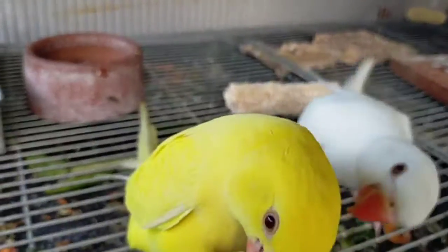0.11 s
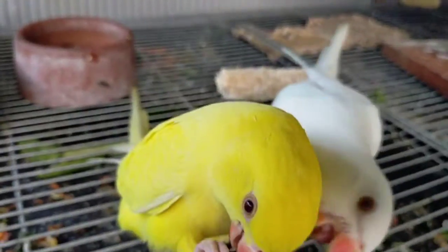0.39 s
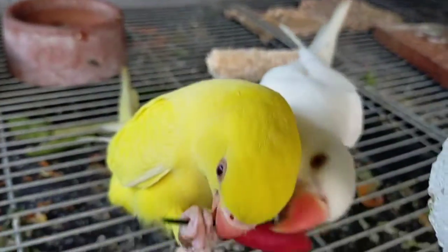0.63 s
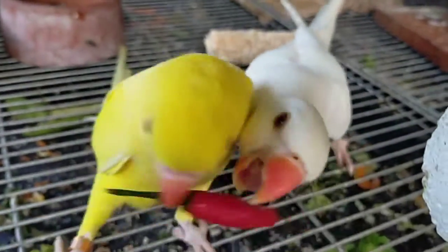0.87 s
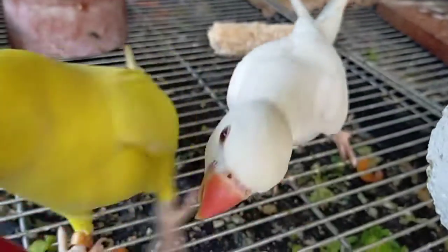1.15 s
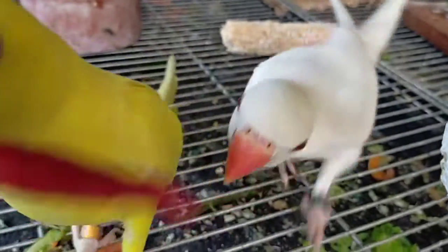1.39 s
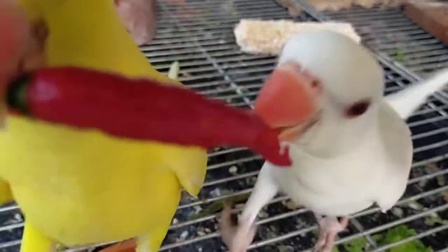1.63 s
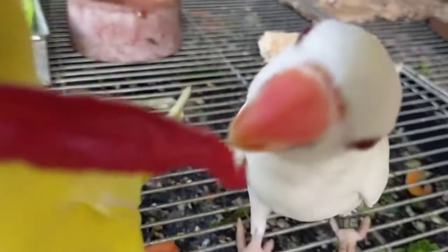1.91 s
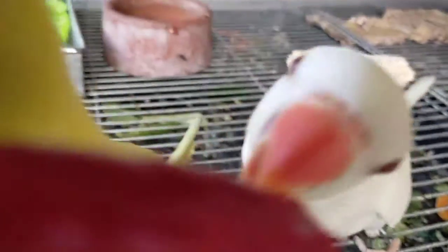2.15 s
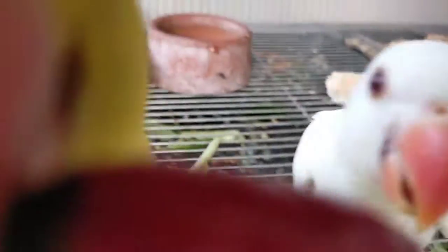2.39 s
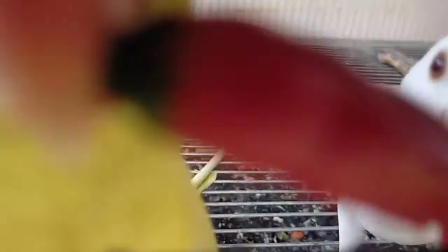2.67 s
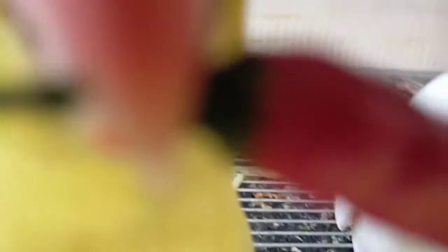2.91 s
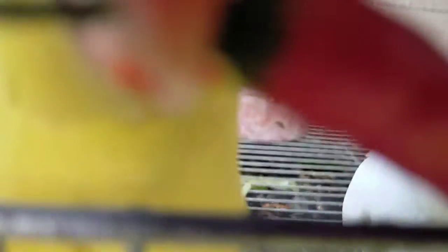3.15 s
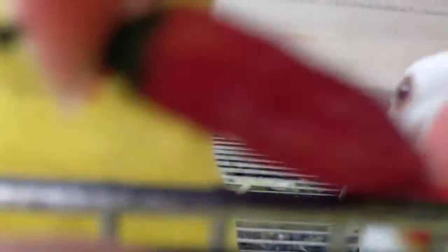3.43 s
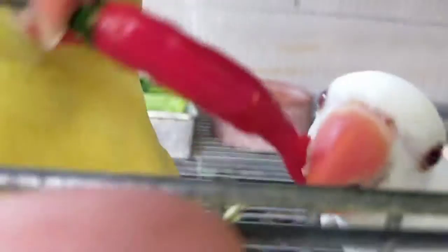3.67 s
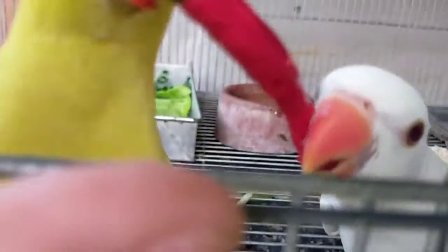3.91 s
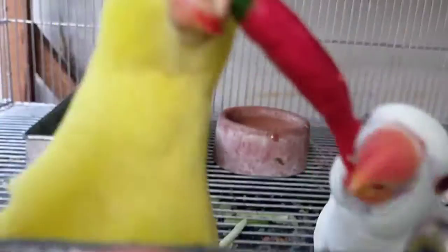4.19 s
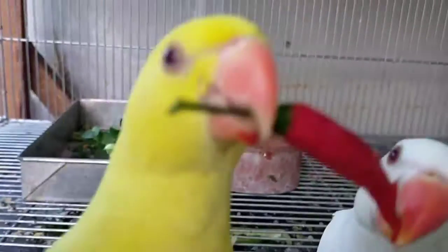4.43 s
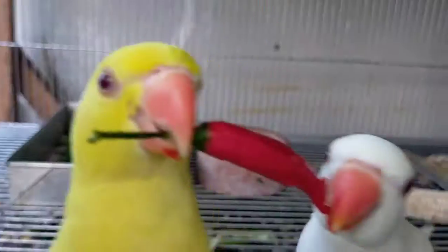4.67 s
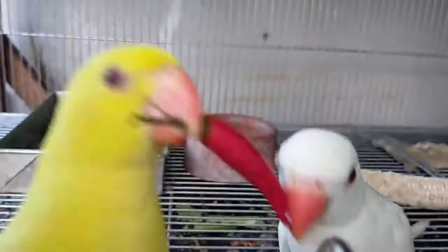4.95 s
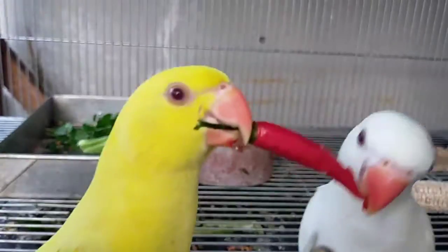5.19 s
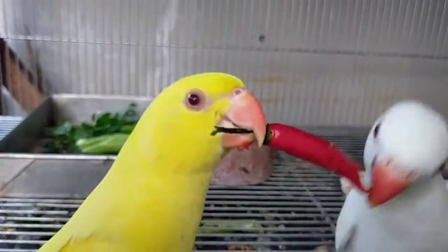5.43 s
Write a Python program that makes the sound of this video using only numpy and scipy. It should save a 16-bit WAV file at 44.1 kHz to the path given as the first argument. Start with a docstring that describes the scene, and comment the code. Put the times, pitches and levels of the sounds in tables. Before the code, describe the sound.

Indoor bird cage, recorded close with some room echo. One bird gives a regular series of dry, scratchy rasps; after a brief pause come two clear, high chirps. A hard click leads into fast, strident two-toned chatter, the loudest part. It ends with a single rasp and a quick two-part warble, leaving quiet room hiss, faint street rumble, distant thin whistles, light claw ticks and a soft rustle.

```python
"""Parakeets close to the microphone in an indoor aviary: one rasps in a steady run as uneven slaps ring its
throat, one chirps twice, and one chatters loudly with both sides of its syrinx. Another warbles, and far off
others whistle; all these notes are near sines that waver and fray. Claws tick on the wire floor as cracks and
dying rattles, feathers rustle as shaped noise, and distant traffic rumbles under the hiss of the room."""
import sys
import numpy as np
from scipy import signal
from scipy.fft import rfft, irfft
from scipy.io import wavfile

SR = 44100
rng = np.random.default_rng(int(sys.argv[2]) if len(sys.argv) > 2 else 0)


def dump_mix(stems):
    """Bounce the given channels to the path in sys.argv[1] as a 16-bit WAV at rate SR."""
    frames = np.atleast_2d(stems).T  # one column per channel
    limited = np.clip(frames, -1, 1)  # hard clip at full scale
    pcm = np.round(limited * 32767).astype(np.int16)
    wavfile.write(sys.argv[1], SR, pcm)


def level_to_linear(level):
    """Convert decibel levels to linear amplitude factors, elementwise."""
    exponent = np.asarray(level, float) / 20
    return 10 ** exponent


N = 245677
TIME = np.arange(N) / SR

# air forced past the syrinx in each chatter burst: start t/s, length/s, level/dB, swell through the hold/dB
AIR_BURSTS = [(2.972, 0.047, -32.5, 3), (3.018, 0.043, -27.5, 4.5), (3.108, 0.091, -34.5, 11),
              (3.226, 0.09, -29, 2.1), (3.34, .096, -29.5, 1), (3.466, 0.084, -26, -1),
              (3.586, .084, -30.5, 1), (3.71, 0.12, -30.5, -5)]


def rms_one(x):
    """Scale to unit power."""
    return x / np.sqrt(np.mean(x ** 2) + 1e-20)


def at_hz(points, hz):
    """Read a spectrum on a log frequency axis."""
    known_hz, known_db = np.transpose(points)
    return np.interp(np.log(hz + 1), np.log(known_hz), known_db)


def coloured(x, spectrum):
    """Give a signal a spectrum, with nothing far outside its ends; rms 1."""
    hz = np.fft.rfftfreq(len(x), 1 / SR)
    inside = (hz > .7 * spectrum[0][0]) * (hz < 1.1 * spectrum[-1][0])
    return rms_one(irfft(rfft(x) * level_to_linear(at_hz(spectrum, hz)) * inside, len(x)))


def drift(rate_hz, size=N):
    """Random wander of rms 1, mostly slower than the rate."""
    r = np.exp(-2 * np.pi * rate_hz / SR)
    wander = signal.lfilter([1], [1, -2 * r, r * r], rng.standard_normal(size + 4000))
    return rms_one(wander[4000:])


def narrow_noise(hz, q):
    """Noise through the same sharp resonance twice, heard as an unsteady tone; rms 1."""
    b, a = signal.iirpeak(hz, q, fs=SR)
    once = signal.lfilter(b, a, rng.standard_normal(N))
    return rms_one(signal.lfilter(b, a, once))


def treble(x, edge_hz):
    """The part above an edge."""
    return signal.sosfilt(signal.butter(2, edge_hz, "high", fs=SR, output="sos"), x)


def ring(x, resonances):
    """Each resonance lifts or dips a region around its centre; rms 1."""
    hz = np.fft.rfftfreq(N, 1 / SR)
    lift_db = sum(db / (1 + (2 * (hz - centre) / width) ** 2) for centre, width, db in resonances)
    return rms_one(irfft(rfft(x) * level_to_linear(lift_db), N))


def envelope(tables, edge_s):
    """Gain of separate sounds, silent between them, with short fades."""
    out = np.zeros(N)
    for rows in tables:
        s, db = np.array(rows)[:, 0], np.array(rows)[:, -1]
        fade = np.clip(np.minimum(TIME - s[0], s[-1] - TIME) / edge_s, 0, 1)
        out += fade * level_to_linear(np.interp(TIME, s, db))
    return out


def arch(start, length, db, shape, swell_db=0):
    """Corner shares, times and levels of one sound: attack, hold, release."""
    attack, release, first_db, last_db = shape
    # attack and release each take at least a fiftieth and at most about half of the sound
    share = np.array([0, np.clip(attack, .02, .49), 1 - np.clip(release, .02, .5), 1])
    corner_db = db + np.array([first_db, 0, swell_db, swell_db + last_db])
    return share, start + length * share, corner_db


def swells(rows, shape):
    """Rows of unpitched sounds as (s, dB) corners."""
    return [np.transpose(arch(*row[:3], shape, *row[3:])[1:]) for row in rows]


def glides(rows, shape):
    """Rows of notes as (s, Hz, dB) corners; the pitch slides evenly from first to last."""
    out = []
    for start, length, db, first_hz, last_hz, *swell_db in rows:
        share, s, corner_db = arch(start, length, db, shape, *swell_db)
        pitch = first_hz + (last_hz - first_hz) * share
        out.append(np.transpose([s, pitch, corner_db]))
    return out


def notes(tables, overtones_db, waver, rough, flutter_rate, fray_db=-60.0):
    """A membrane sings a near sine with overtones; its pitch wavers, its swing flutters and frays into noise."""
    out = np.zeros(N)
    wander, flutter, fray = drift(flutter_rate), drift(flutter_rate), drift(820)
    for rows in tables:
        s, hz = np.array(rows)[:, 0], np.array(rows)[:, 1]
        span = slice(int(s[0] * SR), int(s[-1] * SR))
        pitch = np.interp(TIME[span], s, hz) * (1 + waver * wander[span])
        phase = 2 * np.pi * np.cumsum(pitch) / SR
        tone = np.sin(phase)
        for k, db in enumerate(overtones_db, start=2):
            throat_pass = 1 / (1 + (k * pitch / 12000) ** 8)   # the throat passes little at the very top
            tone += level_to_linear(db) * np.sin(k * phase) * throat_pass
        swing = (1 + rough * flutter[span]) / np.sqrt(1 + rough ** 2)
        swing += level_to_linear(fray_db) * fray[span]
        out[span] += np.sqrt(2) * tone * swing * envelope([rows], edge_s=0.0018)[span]
    return out


def hoarse(throat, per_s, spread_db, breath):
    """Membranes slap shut at uneven moments; the slaps and the air between them ring the throat."""
    sizes = level_to_linear(spread_db * np.minimum(rng.exponential(1, N), 4)) * rng.choice([-1, 1], N)
    slaps = rms_one(sizes * (rng.random(N) < per_s / SR))
    return coloured(slaps + breath * rng.standard_normal(N), throat)


def early(x):
    """The direct sound and a short dense cluster of reflections from wire, wall and dishes."""
    t60_s, cluster_db = .065, -2.5   # the cluster's power is relative to the direct sound
    t = TIME[:SR // 5]
    cluster = rng.standard_normal(len(t)) * level_to_linear(-60 * t / t60_s) * (t > .001)
    cluster *= level_to_linear(cluster_db) / np.sqrt(np.sum(cluster ** 2))
    cluster[0] = 1   # the direct sound
    return signal.fftconvolve(x, cluster / np.sqrt(np.sum(cluster ** 2)))[:N]


def room(x):
    """Diffuse echo: dying noise in bands of three quarters of an octave, convolved with the sound."""
    # decay of the room: f/Hz, t60/s
    room_t60 = [(1000, 0.72), (3500, 0.6), (7000, 0.44), (14000, 0.39)]
    t, band_edges = TIME[:SR], 700 * 2 ** np.arange(0, 4.6, .75)
    tail = np.zeros(SR)
    for low, high in zip(band_edges, band_edges[1:]):
        sos = signal.butter(2, [low, high], "band", fs=SR, output="sos")
        band = signal.sosfilt(sos, rng.standard_normal(SR))
        tail += band * level_to_linear(-60 * t / at_hz(room_t60, np.sqrt(low * high)))
    tail *= t > .004   # the echo starts after a short gap
    return signal.fftconvolve(x, tail / np.sqrt(np.sum(tail ** 2)))[:N]


def street(level_db, patchy_db):
    """The far hubbub of the street: narrow bands of noise that come and go on their own."""
    out = np.zeros(N)
    for hz in np.geomspace(600, 2900, num=14):
        out += narrow_noise(hz, q=22) * level_to_linear(patchy_db * drift(6.0))
    return level_to_linear(level_db) * rms_one(out)


def background():
    """Room hiss, street hubbub, low traffic rumble and a distant motor's hum, a narrow band of noise."""
    # spectra of hiss and rumble: f/Hz, relative level/dB
    hiss_colour = [(150, -5), (200, -3), (250, -3), (300, -8.5), (500, -7.5), (690, -5.5), (1150, -8),
                   (1600, -5), (2050, -1.5), (2650, -2), (3100, -11.5), (3600, -16), (5100, -20.5),
                   (7600, -21.5), (16000, -39)]
    rumble_colour = [(12, -57), (20, 11.5), (107, 0), (166, -21), (220, -30), (290, -22), (480, -120)]
    # slow swelling of hiss, rumble and hum: t/s, level/dB
    hiss_level = [(0.0, -46), (0.17, -44), (0.39, -48), (1.07, -47.5), (2.09, -49), (2.99, -47.5),
                  (3.4, -49), (5.3, -48.5), (5.57, -47.5)]
    rumble_level = [(0.0, -46.5), (0.25, -47), (0.45, -55), (0.57, -45.5), (1.39, -48.5), (1.63, -53.5),
                    (2.0, -49.5), (3.54, -49.5), (3.75, -54.5), (4.56, -55.5), (4.7, -53.5), (5.57, -54.5)]
    hum_level = [(0.0, -49.5), (0.15, -59), (0.53, -44.5), (0.85, -46.5), (1.2, -54), (1.55, -57),
                 (2.19, -52), (2.45, -57), (3.3, -52.5), (3.54, -70.5), (5.57, -68.5)]
    hum_hz, hum_width_hz = 104.7, 31
    hiss = coloured(rng.standard_normal(N), hiss_colour) * level_to_linear(np.interp(TIME, *np.transpose(hiss_level)))
    rumble = coloured(rng.standard_normal(N), rumble_colour)
    rumble *= level_to_linear(np.interp(TIME, *np.transpose(rumble_level)))
    hum = narrow_noise(hum_hz, q=hum_hz / hum_width_hz) * level_to_linear(np.interp(TIME, *np.transpose(hum_level)))
    return hiss + street(level_db=-60.5, patchy_db=5.5) + rumble + hum


def far_birds():
    """Thin whistles and faint low tones from far away, each a bare sliding sine that wavers."""
    # whistles, then low tones: start t/s, length/s, level/dB, first f/Hz, last f/Hz
    whistle_rows = [(2.754, .014, -55, 8600, 7100), (4.215, .045, -56, 7900, 7100),
                    (4.27, 0.1, -54.5, 7300, 7180), (4.745, .02, -62, 5250, 5250),
                    (4.822, .082, -54.5, 7570, 6600), (4.9, .015, -59, 4700, 4680),
                    (5.05, .025, -61, 4480, 4500), (5.095, .02, -61, 4900, 4880),
                    (5.134, .014, -55.5, 8150, 8600), (5.215, .03, -62, 5260, 5200),
                    (5.35, .06, -56.5, 7050, 7100), (5.405, 0.072, -51.5, 7120, 7250)]
    low_tone_rows = [(.94, 0.23, -55, 890, 850), (2.33, 0.079, -51, 690, 650), (5.05, .24, -53, 1500, 1500),
                     (5.45, 0.076, -52, 1077, 1020)]
    # attack share, release share, start/dB, end/dB
    far_shape = (.2, 0.6, -3, -21)
    whistles = notes(glides(whistle_rows, far_shape), [], waver=0.0036, rough=0.16, flutter_rate=110)
    tones = notes(glides(low_tone_rows, far_shape), [], waver=0.0026, rough=0.5, flutter_rate=22)
    return whistles + tones


def rustle():
    """Feathers brush: dense uneven pulses and breathy noise, coloured and swelling briefly."""
    # start t/s, length/s, level/dB
    rustle_rows = [(4.6, .05, -58), (4.82, 0.22, -62), (4.985, 0.12, -47.5), (5.44, 0.17, -59)]
    # f/Hz, relative level/dB
    feather_colour = [(1000, -5), (3000, 3), (6000, -10), (9000, 1.5), (13000, -4), (16000, -2)]
    # attack share, release share, start/dB, end/dB
    rustle_shape = (0.5, 1, -8, -17)
    brushing = hoarse(feather_colour, per_s=9000, spread_db=2.0, breath=0.62)
    return brushing * envelope(swells(rustle_rows, rustle_shape), edge_s=.005)


def ticks():
    """Claws on the wire floor: a sharp crack, then the mesh rattles out as dying noise."""
    # t/s, crack level/dB, rattle level/dB, treble gain/dB, rattle t60/s
    tick_rows = [(.034, -59, -39.5, -0.5, 0.52), (.113, -54, -48, -1, 0.099), (.17, -50, -46, -6, 0.091),
                 (.232, -56, -68, 9, 0.092), (1.567, -61, -43.5, 8, 0.17), (2.948, -28, -40, -22, 0.34),
                 (4.57, -59, -38, 11, 0.26), (5.452, -52, -48, -5, 0.13)]
    # f/Hz, relative level/dB
    mesh_colour = [(350, -62), (600, -23), (768, 5.5), (1100, -11), (1220, 1), (1770, 2), (1890, -7),
                   (2110, 4), (2560, 5), (4020, -9.5), (5140, -19.5), (8190, -11), (15800, -21)]
    noise = coloured(rng.standard_normal(N), mesh_colour)
    bright = treble(noise, edge_hz=4200)
    out = np.zeros(N)
    for s, crack_db, rattle_db, bright_db, t60 in tick_rows:
        after = np.maximum(TIME - s, 0)
        crack = level_to_linear(crack_db - 60 * after / 0.0061)
        rattle = level_to_linear(rattle_db - 60 * after / t60)
        out += (TIME > s) * (crack + rattle) * (noise - bright + level_to_linear(bright_db) * bright)
    return out


def warble():
    """A run of short sliding notes without overtones, slightly frayed."""
    # start t/s, length/s, level/dB, first f/Hz, last f/Hz
    warble_rows = [(3.968, .012, -50, 3800, 3880), (3.986, 0.034, -29.5, 2760, 2500),
                   (4.013, 0.035, -30, 2926, 3023), (4.036, .03, -35.5, 2600, 2400),
                   (4.053, 0.019, -38, 3570, 3030), (4.066, 0.027, -23, 2530, 2653),
                   (4.092, .022, -41.5, 1675, 1620), (4.212, 0.036, -48, 3540, 2940),
                   (4.232, 0.018, -35.5, 2750, 2510), (4.248, 0.025, -36.5, 3640, 3360),
                   (4.264, 0.012, -39, 2990, 2650), (4.268, 0.035, -30, 2540, 2680),
                   (4.296, .02, -46, 1760, 1550)]
    # attack share, release share, start/dB, end/dB
    warble_shape = (0, .3, -15, -7)
    return notes(glides(warble_rows, warble_shape), [], waver=0.015, rough=0.33, flutter_rate=250, fray_db=-27)


def chirps():
    """Two chirps: a bending main voice with a high lead-in, and a second voice under it."""
    # main voice, one table a note: t/s, f/Hz, level/dB
    main_notes = [
        [(2.272, 3800, -37), (2.284, 3744, -39), (2.291, 3900, -28), (2.298, 4820, -34.5), (2.306, 4250, -29.5),
         (2.316, 3700, -33)],
        [(2.314, 3390, -46), (2.322, 3423, -28.5), (2.334, 3390, -34), (2.344, 3420, -35)],
        [(2.342, 4050, -32), (2.35, 3940, -29.5), (2.36, 3660, -31.5), (2.372, 3560, -35), (2.385, 3527, -31.5),
         (2.396, 3450, -40)],
        [(2.446, 4410, -38), (2.451, 3993, -29.5), (2.46, 3784, -30.5), (2.474, 3680, -33), (2.49, 3750, -29.5),
         (2.506, 3793, -27.5), (2.513, 3800, -45)],
    ]
    # second voice, then lead-in: start t/s, length/s, level/dB, first f/Hz, last f/Hz
    under_rows = [(2.306, .03, -33, 2260, 2210), (2.465, 0.038, -27.5, 2403, 2330)]
    lead_rows = [(2.264, 0.0115, -43, 6500, 4240), (2.428, .036, -39, 5950, 5480)]
    # attack share, release share, start/dB, end/dB
    chirp_shape = (0.3, 0, -15, -10)
    main = notes(main_notes, [-11, -19], waver=0.0069, rough=0.16, flutter_rate=120, fray_db=-12.0)
    under = notes(glides(under_rows, chirp_shape), [-18], waver=0.0068, rough=0.55, flutter_rate=140, fray_db=-28)
    lead = notes(glides(lead_rows, chirp_shape), [-8], waver=0.021, rough=0.54, flutter_rate=280)
    return main + lead, under


def windpipe(x, start_hz, end_hz, echo):
    """Echoes inside the windpipe comb the air into bands that climb as the neck pulls in during each burst."""
    times = [s for row in AIR_BURSTS for s in (row[0], row[0] + row[1])]
    spacing_hz = np.interp(TIME, times, [start_hz, end_hz] * len(AIR_BURSTS))
    for passage in range(3):
        x = x + echo * np.interp(TIME - 1 / spacing_hz, TIME, x)
    return rms_one(x)


def chatter():
    """Both sides of the syrinx sing at once and push each other, which adds sum tones; air hisses past."""
    # low side, high side, and a rougher strand between them that mostly climbs late in a burst:
    # start t/s, length/s, level/dB, first f/Hz, last f/Hz, and for the two sides swell through the hold/dB
    low_rows = [ (2.975, 0.027, -22.5, 2430, 2406, -2.5), (3.024, 0.02, -20, 2700, 2810, -11),
                (3.111, 0.023, -20.5, 3320, 3290, -8), (3.149, 0.02, -19.5, 2737, 2760, -5),
                (3.229, 0.021, -20, 3083, 2750, -6), (3.264, .035, -23, 2685, 2756, 2.5),
                (3.35, 0.011, -17, 2810, 2760, -6), (3.378, 0.038, -18.5, 2750, 2707, 3.5),
                (3.469, 0.02, -20.5, 3340, 3290, -3), (3.497, 0.051, -20.5, 2726, 2810, -4),
                (3.588, 0.022, -25.5, 2610, 2850, -4), (3.621, 0.046, -24, 2628, 2793, 5.5),
                (3.713, .026, -20, 2695, 2710, -1), (3.75, 0.043, -19.5, 2733, 2820, -1)]
    high_rows = [ (2.978, 0.017, -30, 4800, 5030, -3), (2.996, 0.023, -20, 5520, 5390, -1.5),
                 (3.018, 0.066, -25, 5120, 5320, -3), (3.122, 0.036, -24, 5154, 5520, 5.5),
                 (3.151, 0.033, -32, 5270, 5570, -3), (3.241, 0.031, -24, 5100, 5330, 2.5),
                 (3.274, .022, -25, 5400, 5650, -4), (3.354, 0.032, -18, 4965, 4920, 2.5),
                 (3.387, 0.0224, -31.5, 5450, 5660, 2), (3.48, 0.024, -20.5, 4920, 5010, 3),
                 (3.508, 0.0316, -27, 5380, 5940, 0.5), (3.6, 0.035, -19, 4950, 4820, -2.5),
                 (3.632, .033, -28.5, 5300, 5900, -4), (3.727, 0.025, -24, 4900, 5135, 4),
                 (3.757, 0.031, -27, 5280, 5860, 1.5)]
    strand_rows = [ (2.985, 0.017, -28, 3100, 3560), (3.026, 0.018, -23.5, 3310, 3390),
                   (3.155, 0.027, -21, 3190, 3420), (3.257, 0.05, -27, 4000, 4295),
                   (3.275, 0.027, -22, 3030, 3560), (3.395, .03, -22.5, 3100, 3590),
                   (3.405, 0.029, -29, 4600, 4370), (3.47, .02, -31.5, 4100, 4000),
                   (3.51, 0.034, -25, 3020, 3600), (3.588, 0.023, -23, 3120, 3080),
                   (3.63, 0.031, -25.5, 3055, 3180), (3.722, 0.022, -28, 4170, 4500),
                   (3.748, 0.015, -21.5, 3150, 3470), (3.768, 0.033, -25.5, 3130, 3480)]
    # throat spectrum: f/Hz, relative level/dB
    chatter_throat = [(1060, -72.5), (1800, -56), (2220, -21), (2710, -8.5), (2940, -15), (3790, -11),
                      (5120, -14), (5870, -18.5), (9160, -19.5), (12700, -26), (15800, -34)]
    # attack share, release share, start/dB, end/dB
    low_shape = (.16, .5, -3.5, -31)
    high_shape = (0.22, 0.5, -11, -10)
    strand_shape = (-0.25, 0.7, -7, -13)
    air_shape = (0.2, 0.1, -9, -18.5)
    low = notes(glides(low_rows, low_shape), [-9.5, -21, -26, -28],
                waver=0.014, rough=0.33, flutter_rate=123, fray_db=-20.0)
    low += notes(glides(strand_rows, strand_shape), [-10, -16, -15],
                 waver=0.018, rough=1.0, flutter_rate=350, fray_db=-10)
    high = notes(glides(high_rows, high_shape), [-13, -20],
                 waver=0.0076, rough=0.29, flutter_rate=370, fray_db=-7.0)
    coupled = level_to_linear(10) * treble(low * high, edge_hz=5100)   # keeps mostly the sum tones
    air = hoarse(chatter_throat, per_s=2000, spread_db=2.0, breath=0.71)
    air = windpipe(air, start_hz=2450, end_hz=2950, echo=.45)
    air = air * envelope(swells(AIR_BURSTS, air_shape), edge_s=.003)
    return treble(treble(low + high + coupled + air, edge_hz=1900), edge_hz=1900)


def rasps():
    """Hoarse pulses in the throat; as the beak opens, more treble gets out and the upper resonance climbs."""
    # start t/s, length/s, level/dB, swell through the hold/dB, treble gain halfway/dB
    rasp_rows = [(.675, 0.084, -31, 1, 2), (.866, 0.085, -32.5, 1, 4), (1.074, 0.094, -32.5, 3, 1),
                 (1.276, 0.094, -34, 1.5, 1), (1.458, .082, -35.5, 2, .1), (1.651, .09, -32, 1, 2),
                 (1.83, 0.093, -34, .5, 1.5), (2.012, 0.076, -33, 3, -1.5), (3.804, .088, -30, 1.5, 4)]
    # throat spectrum: f/Hz, relative level/dB
    rasp_throat = [(710, -53), (1200, -19), (2530, -2.5), (3070, 2.5), (3310, -15), (3610, -7),
                   (4240, -10.5), (6450, -1.5), (8270, -16.5), (10600, -20.5), (15800, -33)]
    # throat resonances: f/Hz, width/Hz, lift/dB
    throat_rings = [(2500, 450, 7), (2840, 43, -5), (3507, 160, 9.5), (5900, 540, -1), (6080, 310, 1.5),
                    (8800, 330, 7.5), (10370, 580, 6), (12500, 240, -26)]
    # attack share, release share, start/dB, end/dB
    rasp_shape = (.22, 0.38, -12, -19)
    # the climbing resonance: from f/Hz, to f/Hz, width/Hz, lift/dB
    climb = (5850, 6600, 580, 3.7)
    beak_opens_db = 11   # treble gained from start to end of a rasp
    voice = ring(hoarse(rasp_throat, per_s=2500, spread_db=0, breath=0.61), throat_rings)
    start, length, *_, bright_db = np.transpose(rasp_rows)
    corners = np.transpose([start, start + length]).ravel()
    progress = np.interp(TIME, corners, [0, 1] * len(rasp_rows))
    from_hz, to_hz, width_hz, lift_db = climb
    shut = ring(voice, [(from_hz, width_hz, lift_db), (to_hz, width_hz, -lift_db)])
    wide = ring(voice, [(from_hz, width_hz, -lift_db), (to_hz, width_hz, lift_db)])
    voice = shut + progress * (wide - shut)
    treble_db = np.interp(TIME, corners, np.repeat(bright_db, 2)) + beak_opens_db * (progress - .5)
    voice = voice + (level_to_linear(treble_db) - 1) * treble(voice, edge_hz=5000)
    return voice * envelope(swells([row[:4] for row in rasp_rows], rasp_shape), edge_s=0.005)


def scene():
    """Every bird with close reflections and its own share of room: least on the warble, most on the far birds."""
    far, warbling = far_birds(), warble()
    chirping, under = chirps()
    loud, rasp = chatter(), rasps()
    near = early(rasp + loud + chirping + under + warbling + far) + ticks() + rustle()
    sent = level_to_linear(-15.5) * rasp + level_to_linear(-15.5) * loud + level_to_linear(-9.0) * chirping
    sent += level_to_linear(-10.0) * under + level_to_linear(-24.5) * warbling + level_to_linear(-4) * far
    return (near + room(sent) + background())[None, :]


def roll_off(x):
    """The treble ends steeply here."""
    return signal.sosfilt(signal.butter(12, 16660, fs=SR, output="sos"), x)


def record(dry):
    """The microphone has peaks and dips in the treble, strongest near the top, which is then cut off steeply."""
    # f/Hz, gain/dB
    mic_response = [(5500, 0.55), (6600, -1), (8300, 1.5), (9400, 0), (10500, 2), (11500, 1.5),
                    (12600, 4.5), (15000, 11), (15900, -12)]
    heard = irfft(rfft(dry) * level_to_linear(at_hz(mic_response, np.fft.rfftfreq(N, 1 / SR))), N)
    cut = signal.sosfilt(signal.ellip(10, .5, 70, 15800, fs=SR, output="sos"), heard)
    return roll_off(cut)


dry = scene()
out = record(dry)
dump_mix(out)
```